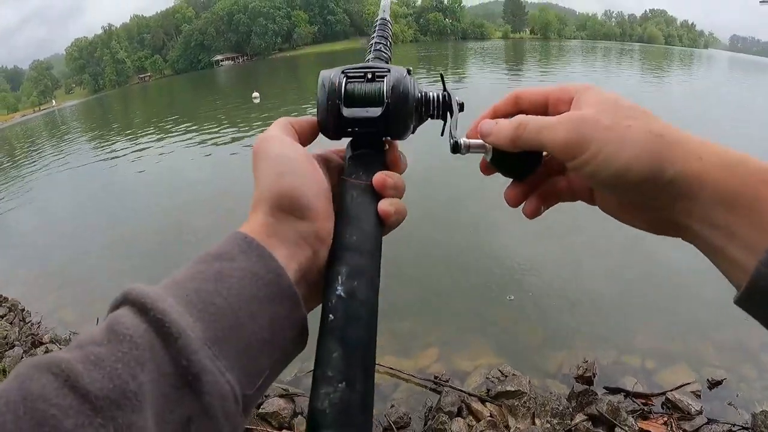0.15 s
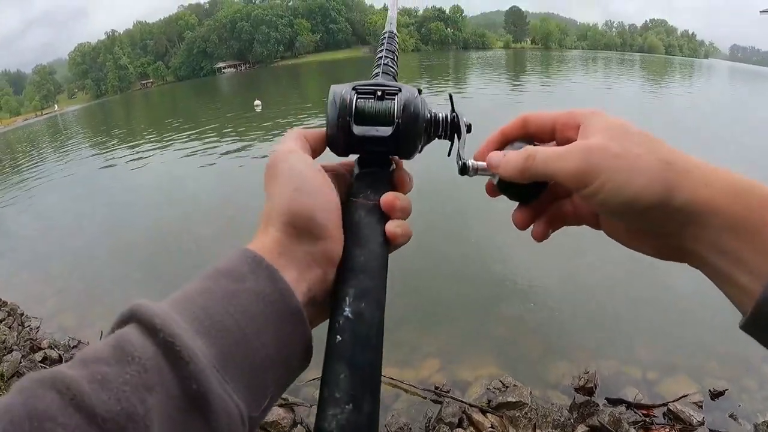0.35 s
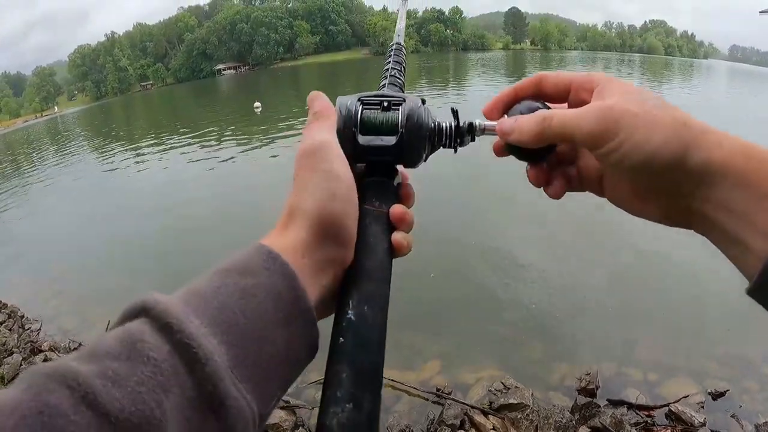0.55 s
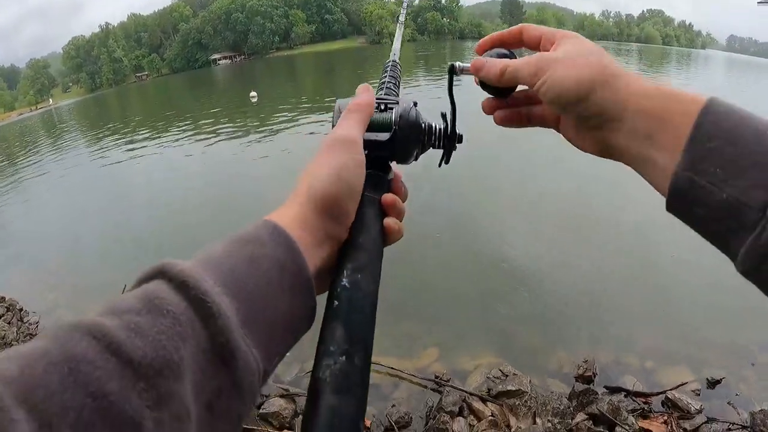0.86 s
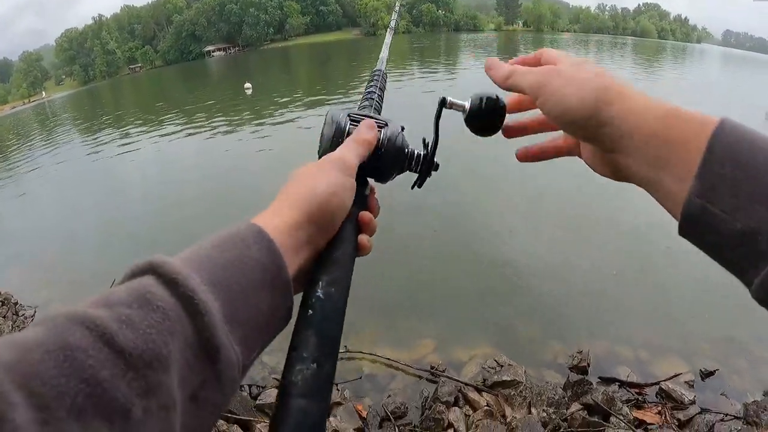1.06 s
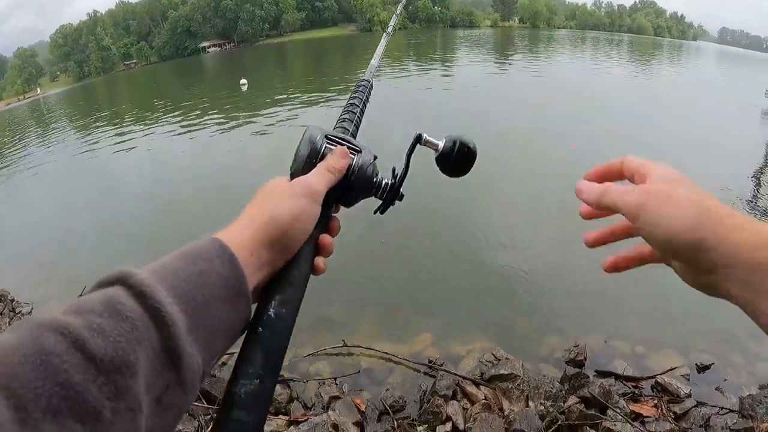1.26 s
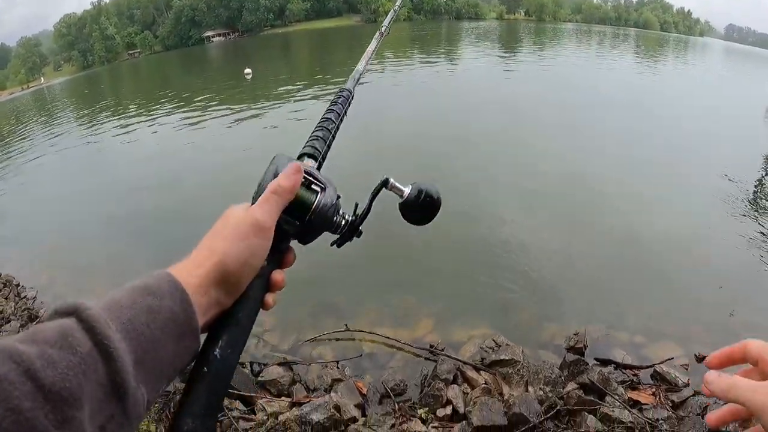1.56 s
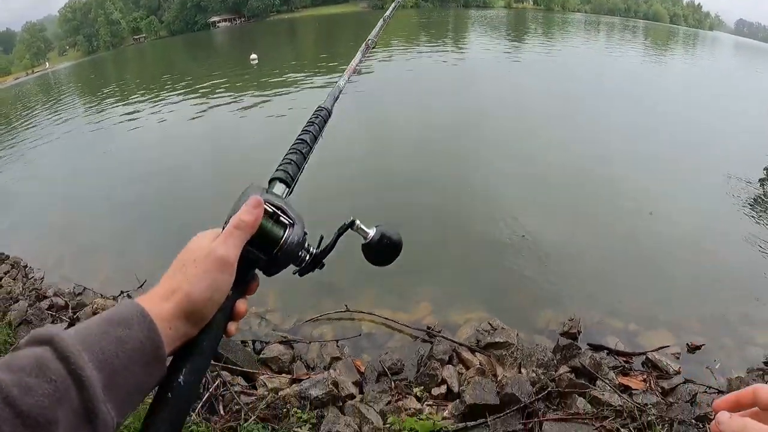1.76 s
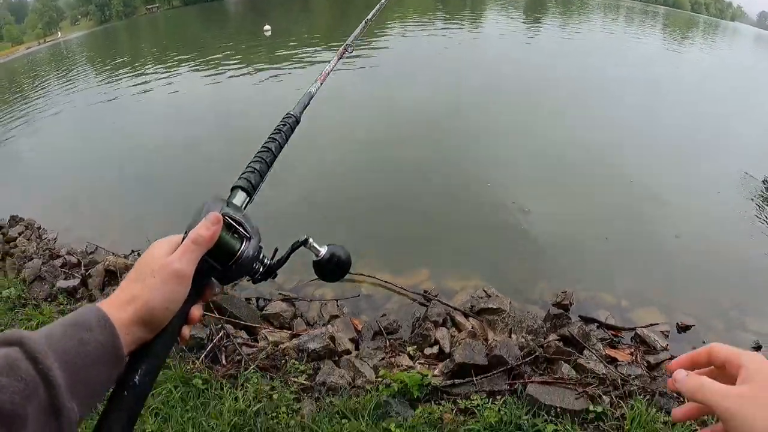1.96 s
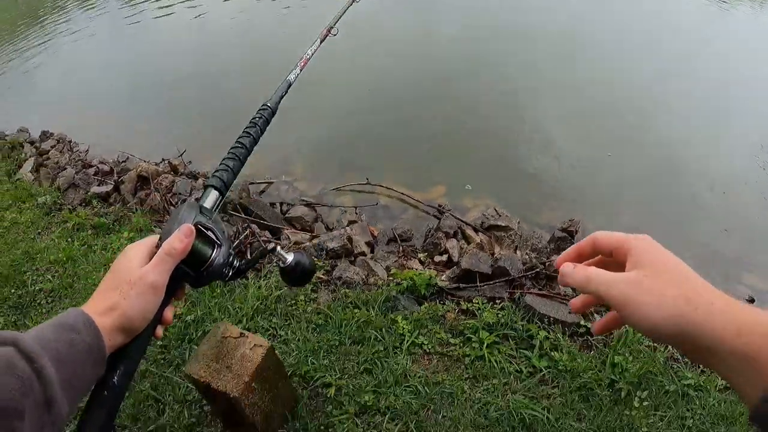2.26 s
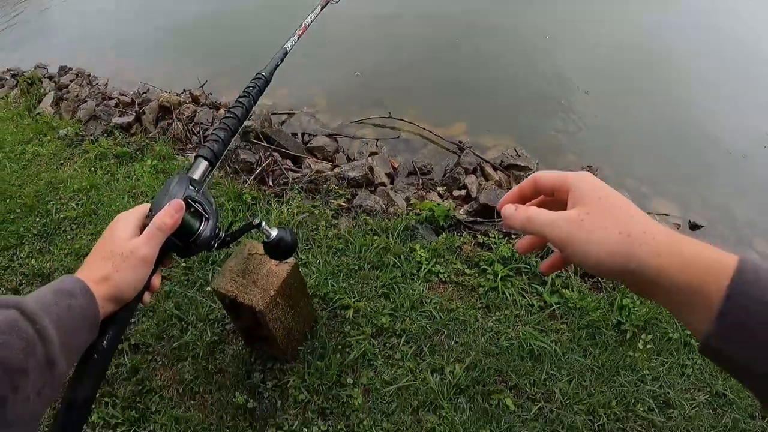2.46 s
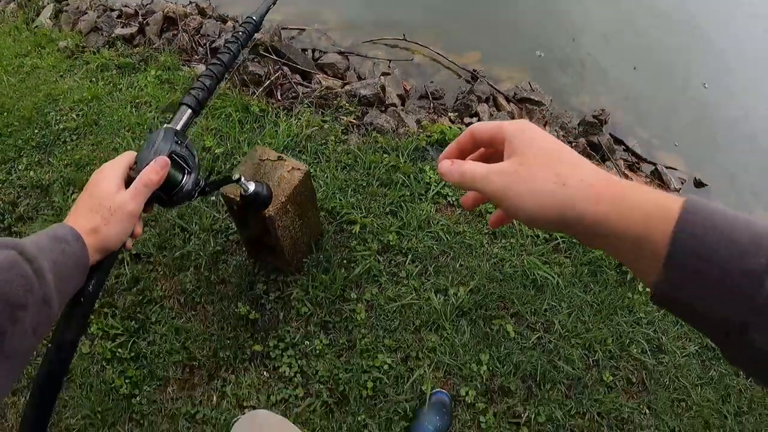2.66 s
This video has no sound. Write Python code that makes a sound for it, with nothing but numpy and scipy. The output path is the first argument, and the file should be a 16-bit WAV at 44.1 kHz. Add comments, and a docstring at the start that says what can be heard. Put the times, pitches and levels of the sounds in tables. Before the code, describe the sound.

A fishing reel ratchets briefly as its handle is cranked. The spool release snaps and knocks, then line runs out with fast, whirring clicks that speed up and slow. It is close to the microphone, outdoors, over a faint air rumble.

```python
"""On a quiet bank, a fishing reel is held close, with low air rumble and faint ticks of fingers and line.
Its clicker ratchets as the handle is cranked, the spool release snaps and knocks, then line runs out and
the ratchet races and slows. Each click is a pawl strike with a brief chatter, filtered by the resonances of
the reel's shell; decaying tones add the faint ring of the rod. Filtered noise makes the whirr and the air."""
import sys
import numpy as np
from scipy import signal
from scipy.fft import rfft, irfft
from scipy.io import wavfile
from scipy.ndimage import uniform_filter1d

SR = 44100
rng = np.random.default_rng(int(sys.argv[2]) if len(sys.argv) > 2 else 0)


def transcribe(u):
    """Save the signal u as a 16-bit wav file named by the first command-line argument.

    u: samples, shape (n,) or (channels, n), limited to [-1, 1]; the rate is SR.
    q: integer samples, one column per channel.
    """
    v = np.clip(np.atleast_2d(u).T, -1, 1)
    q = np.round(v * 32767).astype(np.int16)
    wavfile.write(sys.argv[1], SR, q)


N = 123479

# How fast the ratchet turns, first cranked, then as line runs out.
# Each row: time in seconds, speed in teeth per second.
CRANK_SPEED = [(0.6017, 39.23), (0.634, 59.91), (0.687, 49.33), (0.786, 63.73), (0.838, 51.74),
               (0.898, 65.77), (0.949, 52.54), (0.969, 41.83), (1.02, 16.94)]
RUN_SPEED = [(1.5373, 24.58), (1.558, 42.3), (1.631, 42.79), (1.689, 33.4), (1.749, 57.44), (1.791, 34.82),
             (1.811, 25.92), (1.881, 42.36), (1.968, 36.68), (2.038, 63.94), (2.09, 63.54), (2.172, 97.15),
             (2.26, 93.3), (2.32, 98.34), (2.403, 75.27), (2.478, 77.77), (2.539, 55.28), (2.576, 57.52),
             (2.742, 42.18), (2.8, 46.27)]
# Typical strength of one click, as rms over 10 ms. Each row: time in seconds, level of the lows in dB,
# of the middle in dB, of the treble in dB, left minus right in dB (before the band offsets below).
CRANK_LEVEL = [(0.6, -33, -30.5, -27, 0), (0.66, -34.5, -30.5, -30.5, 0.3), (0.72, -31, -26, -30.5, -0.2),
               (0.78, -36, -26, -31.5, -1.3), (0.85, -32.5, -29, -30, 1), (0.92, -32, -30, -32.5, 1.5),
               (0.97, -31, -25.5, -29, 0.5), (1.02, -33.5, -27.3, -29.5, 1.5)]
RUN_LEVEL = [(1.54, -37, -28.5, -30.5, 2.5), (1.57, -37, -25.5, -31.5, 3.0), (1.62, -40, -33.5, -32, 3.7),
             (1.69, -38.5, -30, -31.5, 3.7), (1.73, -37, -28, -30.9, 3.3), (1.85, -41, -27, -33, 3.5),
             (1.91, -44, -26.5, -30.5, 3.2), (1.96, -43.5, -32, -30.5, 3.4), (2.05, -38.5, -30, -30, 3.5),
             (2.13, -49, -26, -32, 4), (2.18, -43, -32.5, -30.5, 4.3), (2.28, -45, -26.6, -32.5, 4.0),
             (2.31, -43, -34, -30, 4.1), (2.41, -45.5, -26.5, -33, 3.8), (2.5, -42, -31.5, -30.5, 3.8),
             (2.61, -46.5, -25, -29.5, 3.9), (2.68, -48, -31, -30.5, 4.4), (2.79, -43, -31.5, -30.5, 3.6)]
# Single teeth slipping past the pawl. Each row: start in seconds, then the same four columns.
LONE_CLICKS = [(.3334, -35, -30.5, -30, 3), (1.4857, -34.5, -30, -31.5, 2)]
# Resonances of the reel's shell. Each row: pitch in Hz, rough width in Hz, gain in dB when cranked,
# gain in dB when running free.
SHELL_RESONANCES = [(1133, 340, 4, 1), (1540, 870, 2.5, -2.5), (1940, 660, -1, 1.5), (2860, 910, -4, 4.5),
                    (3600, 370, 8.5, 3), (4003, 120, 11, 8.5), (4522, 370, 11, 12), (5040, 350, 2.5, 7),
                    (5580, 1250, -3.5, 2.5), (6116, 530, 6, 4), (7780, 990, -3.5, 6.5),
                    (8950, 870, 0.5, 3.5), (11850, 1300, -8.5, -6), (14700, 1500, -28, -39)]
# Ringing of rod and frame. Each row: pitch in Hz, relative level in dB, seconds to fade by 60 dB.
ROD_TONES = [(490.5, 9, 0.25), (530.4, 15.5, 0.19), (828, 6.5, 0.18), (1044, 17.5, 0.15), (1205, -2, 0.05),
             (1640, -8, 0.052), (3700, -26, .15), (4600, -6, 0.11)]
# Ping of the pawl spring. Each row: time in seconds, strongest level in dB against the shell.
SPRING_LEVEL = [(1.5, -17), (1.95, -16), (2.08, -3.5), (2.2, -6), (2.3, -10), (2.38, 1), (2.5, 0.5),
                (2.62, 2), (2.79, -7)]
# Blows of the spool release. Each row: start in seconds, rms over 10 ms in dB, chatter decay in seconds.
SNAPS = [(1.2348, -36.5, 0.0031), (1.2401, -19.5, 0.00067)]
KNOCKS = [(1.3476, -26, 0.0021)]
# Tone colour of those blows. Each row: frequency in Hz, relative gain in dB.
SNAP_COLOUR = [(100, -24), (400, -10), (470, -5), (525, 4.5), (600, -9), (800, -16.5), (1500, -9.5),
               (2400, -5.5), (3400, -3), (5000, -3.5), (6300, -11), (7800, -11), (9500, -23),
               (12500, -15.5), (16000, -50)]
KNOCK_COLOUR = [(90, -41), (220, -3.5), (480, -0.5), (900, 1.5), (1450, 4), (2200, -13.5), (3300, 1.5),
                (4500, -10), (7500, -8.5), (9500, -32), (13500, -35), (16000, -72)]
# Faint ticks of fingers and line. Each row: start in seconds, rms over 10 ms in dB, centre in Hz,
# decay in seconds.
TICKS = [(0.2196, -59.5, 4500, .004), (.402, -67, 6960, 0.0024), (0.475, -55, 6800, 0.018),
         (1.0943, -53.5, 4700, 0.0036), (1.1333, -60, 4520, 0.0029), (1.4401, -54.5, 3000, 0.001),
         (1.4606, -47, 4500, 0.0069)]
# Tone colour of the air. Each row: frequency in Hz, relative gain in dB.
AIR_COLOUR = [(20, -26), (35, -10), (58, -1.5), (75, -1.5), (100, -2.5), (120, -5), (145, -2), (210, -15.5),
              (380, -21), (530, -23.5), (1020, -28.5), (1400, -27), (2350, -37.5), (3720, -41), (7000, -43),
              (9300, -51), (12500, -58), (14000, -85)]
# Rise and fall of the low rumble. Each row: time in seconds, relative level in dB.
RUMBLE_LEVEL = [(0, 7), (.1, 3.5), (.17, 0.5), (.42, 3.5), (.58, 3), (1.0, 1), (1.3, 3), (1.55, 0),
                (1.75, 2), (2.0, 0), (2.25, -2.5), (2.37, 1), (2.5, 1), (2.6, 1), (2.8, -2.5)]
# Tone colour of the turning spool. Each row: frequency in Hz, relative gain in dB.
WHIRR_COLOUR = [(200, -23), (650, -12), (1050, -3), (1600, 13), (3500, 3), (6000, -2.5), (9000, 1.5),
                (12500, -18.5), (14000, -32)]

SIZE = 2048  # samples in one short sound
T = np.arange(SIZE) / SR
F = np.maximum(np.fft.rfftfreq(SIZE, 1 / SR), 1)
ALL_F = np.maximum(np.fft.rfftfreq(N, 1 / SR), 1)
SIDES = np.array([[1], [-1]])  # opposite signs for left and right

AIR_DB, RUMBLE_EDGE_HZ, AIR_WIDE_HZ = -45, 290, 660
WIDTH, WIDE_ABOVE_HZ = 0.13, 13400  # share of opposed noise; far more of it at the very top
RATTLE_S, RATTLE_HZ = 0.005, 3900  # the housing buzzes on, duller
TOOTH_LIKENESS, CLICK_SCATTER_DB = 0.858, 1.3
LOW_EDGE_HZ, HIGH_EDGE_HZ = 2020, 5160  # borders of lows, middle and treble
BAND_PAN_DB = np.array([-4, -1.6, 0])  # added to left minus right in lows, middle and treble
SPRING_HZ, SPRING_S = 5770, 0.0017
CRANK_ROD_DB, RUN_ROD_DB, LONE_ROD_DB = -33, -40, -50.5  # ring against the click's treble
SNAP_ROD_DB, KNOCK_ROD_DB = -42.5, -42  # ring against the blow
WHIRR_DB, WHIRR_DB_PER_DOUBLING, WHIRR_AT_TEETH_PER_S = -43.5, 12, 77.6
GROUND_S, BANK_DB, BANK_T60_S, BANK_HZ = 0.0085, -23, 0.099, 1680
PORT_PHASE, PORT_PHASE_HZ = 0.53, 567  # lead of the right side in radians; where half of it is reached
TOP_HZ = 15800


def undb(db):
    """Decibels to gain."""
    return 10 ** (np.asarray(db) / 20)


def unit(x):
    """Scale to an energy of one, averaged over the sides."""
    return x / np.sqrt(np.sum(x ** 2) / len(np.atleast_2d(x)))


def sized(x, db):
    """Set a short sound's rms, counted over 10 ms."""
    return unit(x) * undb(db) * np.sqrt(SR / 100)


def add(out, s, x):
    """Mix a sound in at s seconds."""
    i = int(s * SR)
    if i < N:
        out[:, i:i + x.shape[-1]] += x[..., :N - i]


def follow(points, t):
    """Read a (time, value) table at the times t."""
    return np.interp(t, *np.array(points).T)


def colour(points, f):
    """Gain at f from (Hz, dB) points, joined along log frequency."""
    hz, db = np.array(points).T
    return undb(np.interp(np.log(f), np.log(hz), db))


def shape(x, gain):
    """Filter to the given gain at each frequency, without sounding early."""
    cepstrum = irfft(np.log(gain + 1e-6))
    # folding the cepstrum forward gives the minimum-phase filter
    cepstrum[1:SIZE // 2] *= 2
    cepstrum[SIZE // 2 + 1:] = 0
    response = np.exp(rfft(cepstrum, 2 * SIZE))
    return irfft(rfft(x, 2 * SIZE) * response)[..., :SIZE]


def dull(x, hz):
    """Gentle low-pass."""
    return signal.sosfilt(signal.butter(2, hz, fs=SR, output="sos"), x)


def stereo(noise):
    """Left and right from a shared and an opposed noise, wider at the very top."""
    width = WIDTH + 1.3 / (1 + (WIDE_ABOVE_HZ / F) ** 10)
    return noise[0] + irfft(rfft(noise[1]) * width) * SIDES


def air():
    """Noise as a low swelling rumble, nearly alike on both sides, under a thin wider hiss."""
    mid, side = rfft(rng.standard_normal((2, N))) * colour(AIR_COLOUR, ALL_F)
    width = 0.082 + 0.9 * (ALL_F / (ALL_F + AIR_WIDE_HZ)) ** 2
    both = mid + side * width * SIDES
    low = 1 / (1 + (ALL_F / RUMBLE_EDGE_HZ) ** 4)
    rumble = irfft(both * low, N) * undb(follow(RUMBLE_LEVEL, np.arange(N) / SR))
    hiss = irfft(both * (1 - low), N)
    return unit(rumble + hiss) * np.sqrt(N) * undb(AIR_DB)


def ticks():
    """Small scuffs of fingers and line: fading noise through one broad resonance."""
    out = np.zeros((2, N))
    for s, db, hz, decay in TICKS:
        scuff = stereo(rng.standard_normal((2, SIZE))) * np.exp(-T / decay)
        resonance = 1 / np.hypot(1, 3 * (F / hz - hz / F))
        add(out, s, sized(shape(scuff, resonance / (1 + (F / 9800) ** 12)), db))
    return out


def blow(noise, chatter_s, chatter_db, rattle_db):
    """One contact: a sharp strike, then chatter and a duller rattle, each in dB against the strike."""
    grain = stereo(noise)
    strike = T == 0
    chatter = undb(chatter_db) * unit(grain * np.exp(-(T / chatter_s) ** 1.1))
    rattle = undb(rattle_db) * unit(dull(grain, RATTLE_HZ) * np.exp(-T / RATTLE_S))
    force = rfft(strike + chatter + rattle)
    # level the broad spectrum, so that every blow carries all frequencies about evenly
    broad = uniform_filter1d(np.mean(abs(force) ** 2, axis=0), size=45)
    return shape(irfft(force), 1 / np.sqrt(broad))


def rod(blows, db):
    """The rod and frame ring on after each (s, dB) blow, as a sum of decaying tones."""
    t, pushes = np.arange(SR // 2) / SR, np.zeros((1, N))
    ring = np.zeros(len(t))
    for hz, tone_db, t60 in ROD_TONES:
        ring += undb(tone_db) * np.sin(2 * np.pi * hz * t) * np.exp(-np.log(1000) * t / t60)
    for s, blow_db in blows:
        add(pushes, s, undb([db + blow_db + 2 * rng.standard_normal()]))
    return signal.fftconvolve(pushes, ring[None])[:, :N]


def shell_gain(free):
    """The reel's shell: summed power of its resonances over a weak broad floor."""
    power = undb(-28) * F ** 4 / (F ** 4 + 420 ** 4) / (1 + (F / 6000) ** 4)
    for hz, width, cranked_db, free_db in SHELL_RESONANCES:
        detune = (F / hz - hz / F) * hz / width / 1.45
        power += undb(2 * (free_db if free else cranked_db)) / (1 + detune ** 2) ** 2
    return np.sqrt(power)


def teeth(speed, levels):
    """Turn the wheel at the given speed; one row per tooth passed: time, band levels, left minus right."""
    start, end = speed[0][0], speed[-1][0]
    t = np.arange(start, end, 1 / SR)
    turned = np.cumsum(follow(speed, t)) / SR
    times = np.interp(np.arange(int(turned[-1]) + 1), turned, t)
    level_s, *columns = np.array(levels).T
    return np.array([times] + [np.interp(times, level_s, column) for column in columns]).T


def ratchet(clicks, free, chatter_s, chatter_db, rattle_db, rod_db):
    """The pawl strikes each tooth much like the last and rings the shell; running free, its spring pings."""
    shell = shell_gain(free)
    spring = free * unit(np.sin(2 * np.pi * SPRING_HZ * T) * np.exp(-T / SPRING_S))
    low, high = 1 / (1 + (F / LOW_EDGE_HZ) ** 10), 1 / (1 + (HIGH_EDGE_HZ / F) ** 20)
    bands = [low, 1 - low - high, high]
    out, noise = np.zeros((2, N)), rng.standard_normal((2, SIZE))
    for s, *band_dbs, pan_db in clicks:
        fresh = rng.standard_normal((2, SIZE))
        noise = TOOTH_LIKENESS * noise + np.sqrt(1 - TOOTH_LIKENESS ** 2) * fresh
        ringing = unit(shape(blow(noise, chatter_s, chatter_db, rattle_db), shell))
        ping = spring * rng.uniform(0.49, 1) * undb(follow(SPRING_LEVEL, s))
        spectrum = rfft(ringing + ping)
        click = np.zeros((2, SIZE))
        for band, db, pan in zip(bands, band_dbs, pan_db + BAND_PAN_DB):
            click += sized(irfft(spectrum * band) * undb(pan * SIDES / 2), db)
        scatter = undb(CLICK_SCATTER_DB * rng.standard_normal())
        add(out, s, click[:, :SIZE * 3 // 4] * scatter)
    return out + rod([(row[0], row[3]) for row in clicks], rod_db)  # pushed by the treble level


def whirr(speed):
    """Spool and gears rub between clicks: noise that grows louder the faster they turn."""
    rate = np.interp(np.arange(N) / SR, *np.array(speed).T, left=1, right=1)  # almost silent outside
    mid, side = irfft(rfft(rng.standard_normal((2, N))) * colour(WHIRR_COLOUR, ALL_F), N)
    db = WHIRR_DB + WHIRR_DB_PER_DOUBLING * np.log2(rate / WHIRR_AT_TEETH_PER_S)
    return unit(mid + 0.23 * side * SIDES) * np.sqrt(N) * undb(db)


def release(blows, points, chatter_db, rattle_db, rod_db):
    """The spool release hits the frame: coloured blows that also ring the rod."""
    out = np.zeros((2, N))
    for s, db, decay in blows:
        hit = blow(rng.standard_normal((2, SIZE)), decay, chatter_db, rattle_db)
        add(out, s, sized(shape(hit, colour(points, F)), db))
    return out + rod([row[:2] for row in blows], rod_db)


def bank(x):
    """Faint dull scatter from the ground and the stones: the sound smeared by late, fading noise."""
    t = np.arange(SR // 2) / SR
    fade = np.exp(-np.log(1000) * t / BANK_T60_S) * (t > GROUND_S)
    mid, side = dull(rng.standard_normal((2, len(t))), BANK_HZ) * fade
    echo = undb(BANK_DB) * unit(mid + 1.17 * side * SIDES)
    return x + signal.fftconvolve(x, echo, axes=1)[:, :N]


def scene():
    """Cranking, release and running line over the air of the bank."""
    reel = ratchet(LONE_CLICKS, True, chatter_s=0.0019, chatter_db=19.5, rattle_db=7, rod_db=LONE_ROD_DB)
    reel = reel + ratchet(teeth(CRANK_SPEED, CRANK_LEVEL), False,
                          chatter_s=0.0013, chatter_db=15, rattle_db=-2.5, rod_db=CRANK_ROD_DB)
    reel = reel + release(SNAPS, SNAP_COLOUR, chatter_db=10.5, rattle_db=-6, rod_db=SNAP_ROD_DB)
    reel = reel + release(KNOCKS, KNOCK_COLOUR, chatter_db=16, rattle_db=-3, rod_db=KNOCK_ROD_DB)
    reel = reel + ratchet(teeth(RUN_SPEED, RUN_LEVEL), True,
                          chatter_s=0.0012, chatter_db=9.5, rattle_db=-6, rod_db=RUN_ROD_DB)
    reel = reel + whirr(CRANK_SPEED) + whirr(RUN_SPEED)
    return bank(reel + ticks()) + air()


def record(dry):
    """The right microphone port leads slightly in phase; a steep low-pass cuts the top."""
    lead = PORT_PHASE * ALL_F ** 2 / (ALL_F ** 2 + PORT_PHASE_HZ ** 2)
    ports = irfft(rfft(dry) * np.exp(-0.5j * lead * SIDES), N)
    return signal.sosfilt(signal.ellip(8, 0.2, 70, TOP_HZ, fs=SR, output="sos"), ports)


dry = scene()
out = record(dry)
transcribe(out)
```